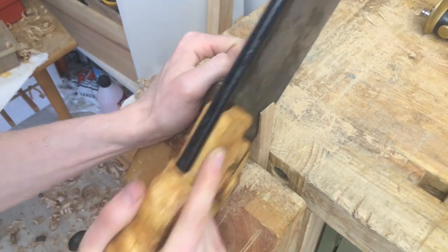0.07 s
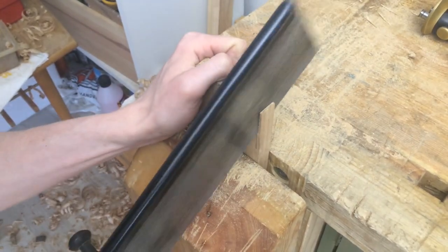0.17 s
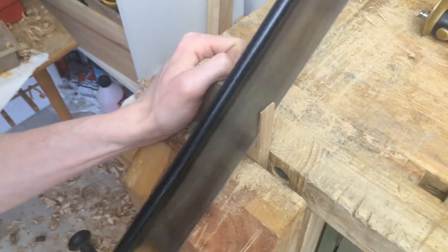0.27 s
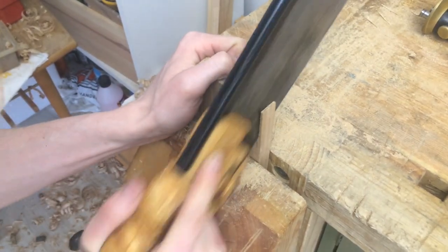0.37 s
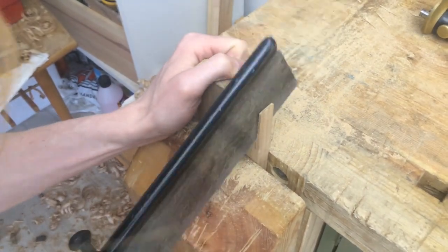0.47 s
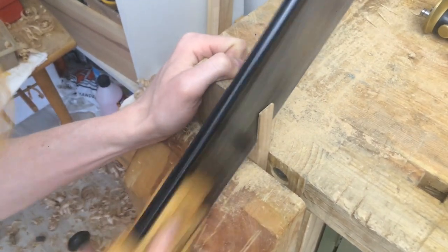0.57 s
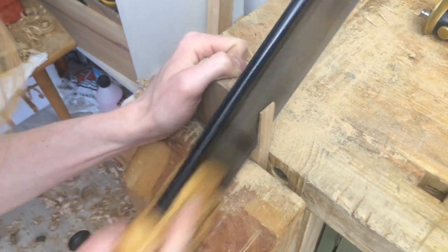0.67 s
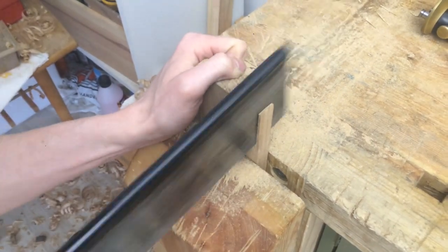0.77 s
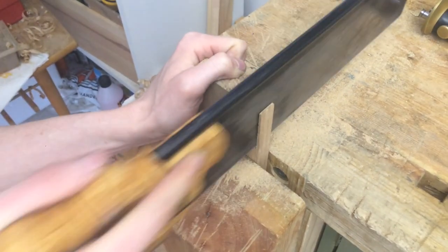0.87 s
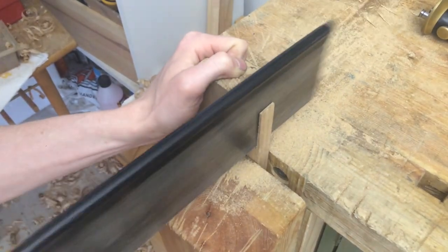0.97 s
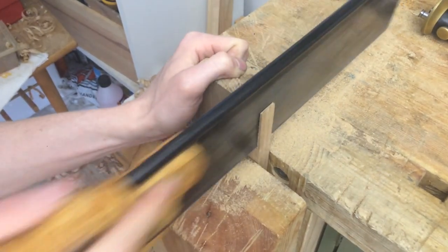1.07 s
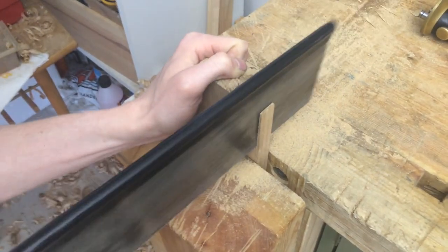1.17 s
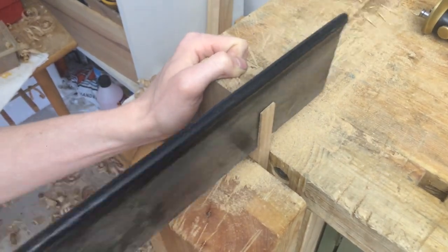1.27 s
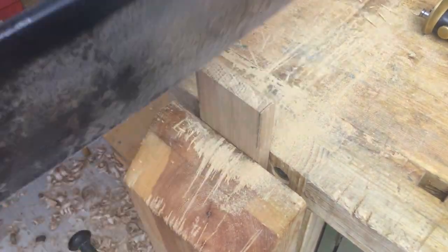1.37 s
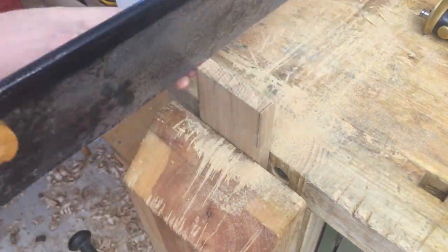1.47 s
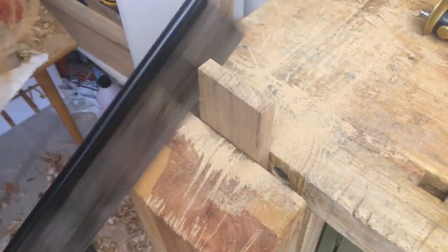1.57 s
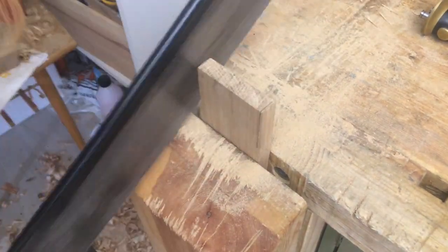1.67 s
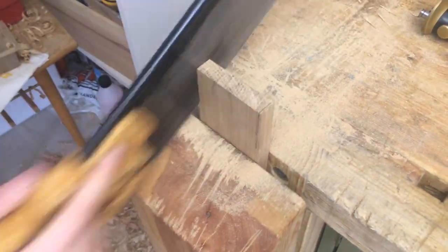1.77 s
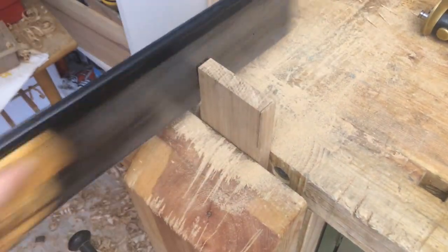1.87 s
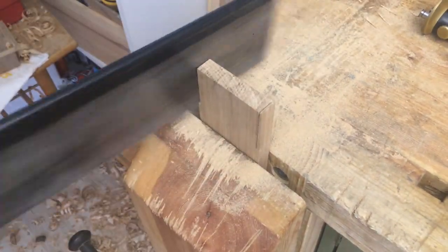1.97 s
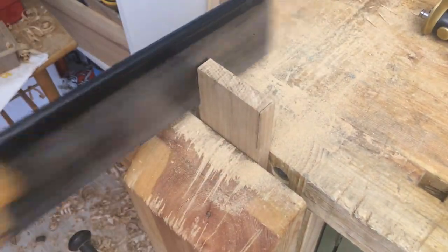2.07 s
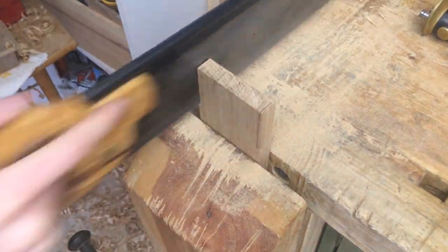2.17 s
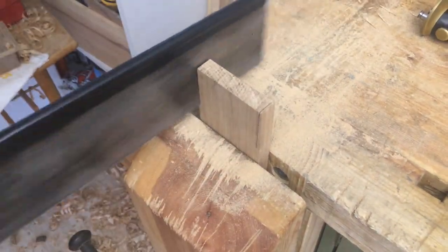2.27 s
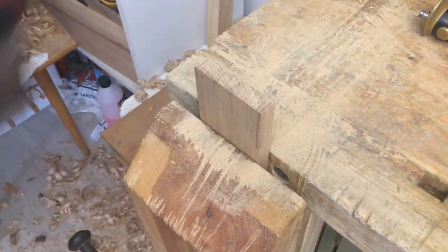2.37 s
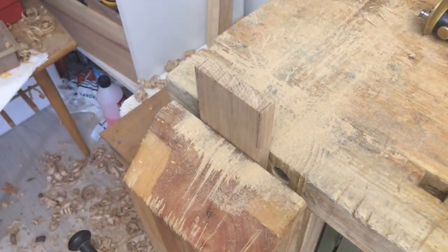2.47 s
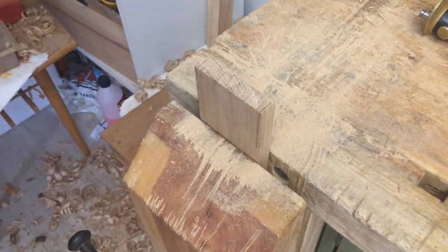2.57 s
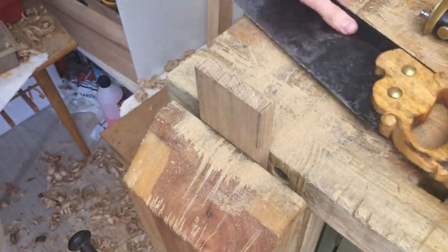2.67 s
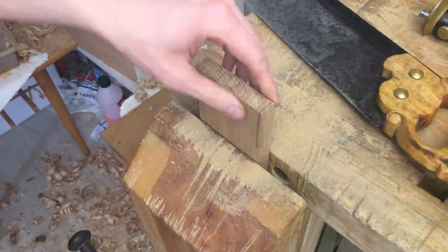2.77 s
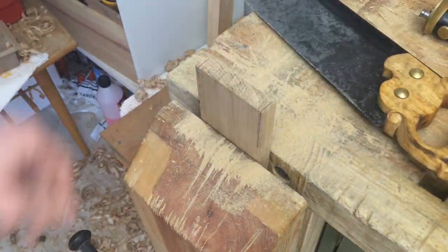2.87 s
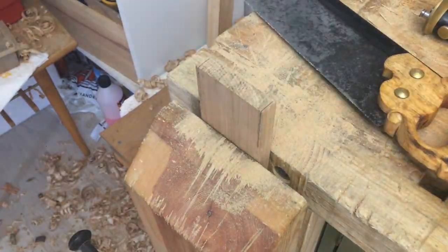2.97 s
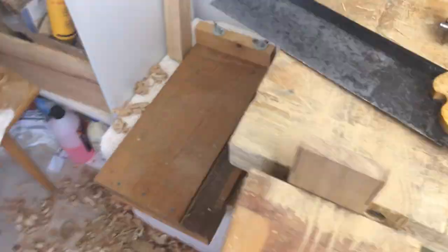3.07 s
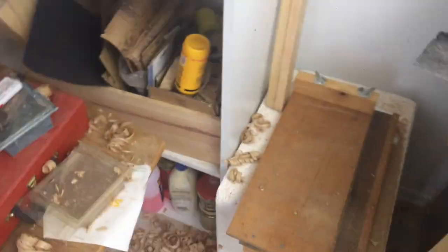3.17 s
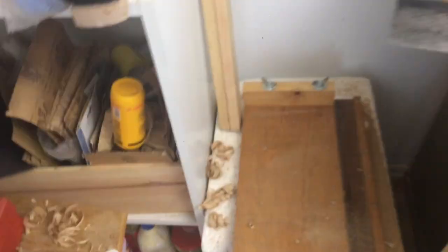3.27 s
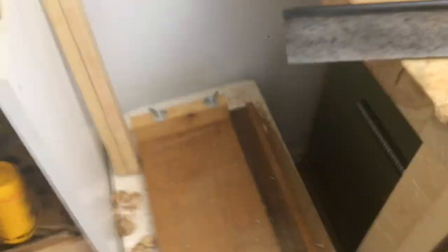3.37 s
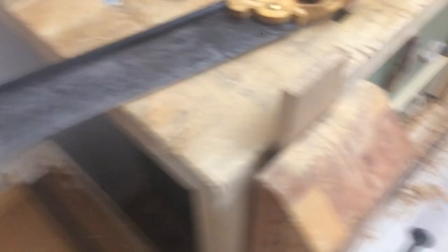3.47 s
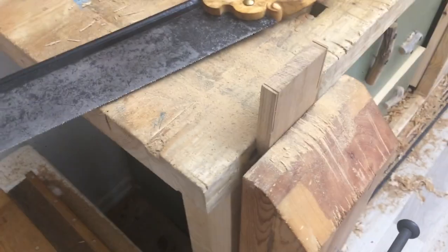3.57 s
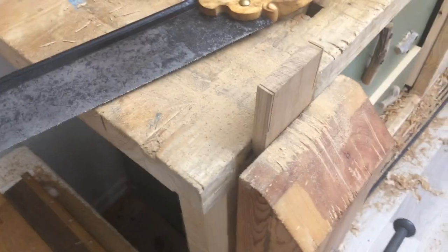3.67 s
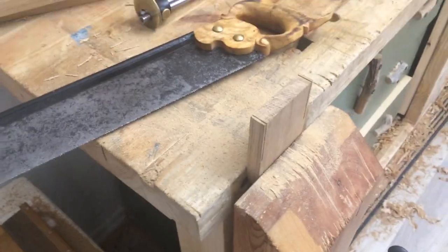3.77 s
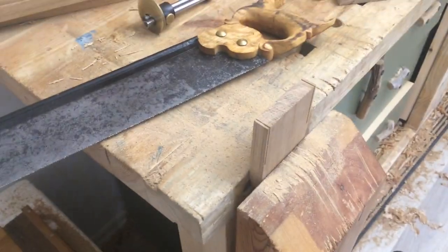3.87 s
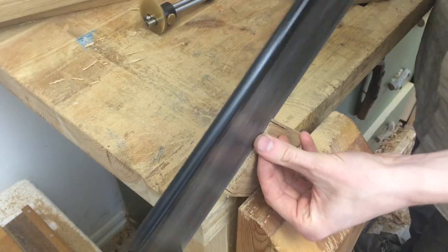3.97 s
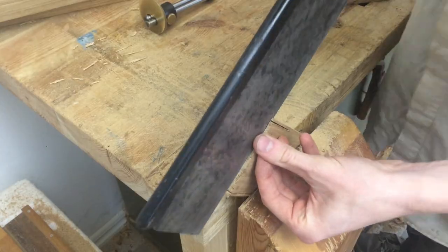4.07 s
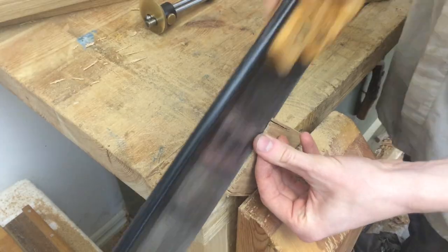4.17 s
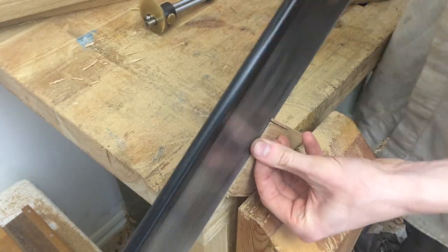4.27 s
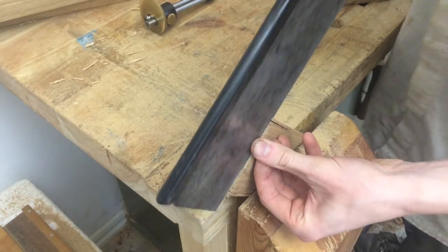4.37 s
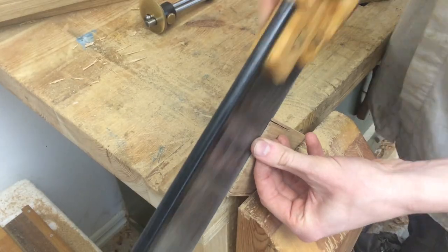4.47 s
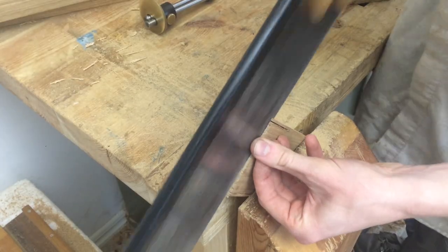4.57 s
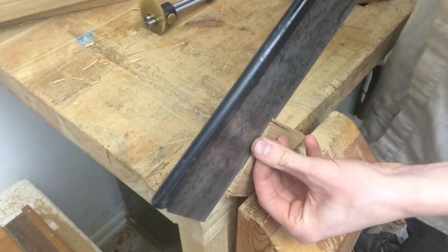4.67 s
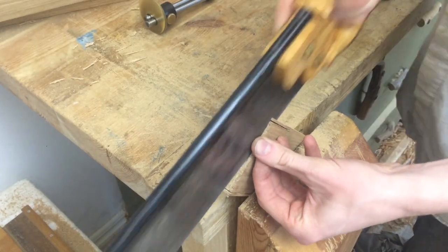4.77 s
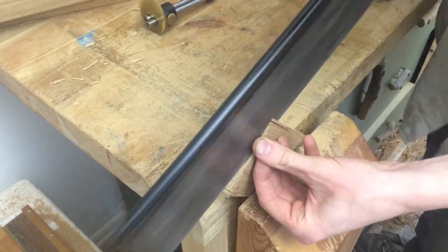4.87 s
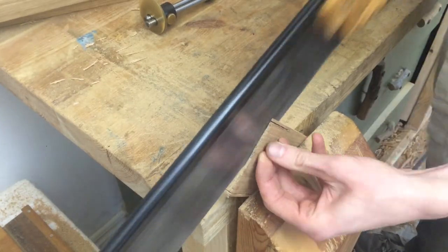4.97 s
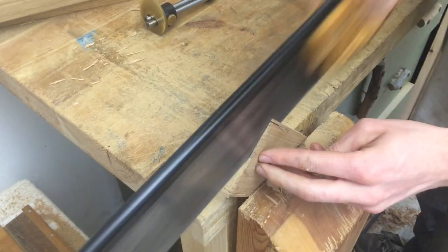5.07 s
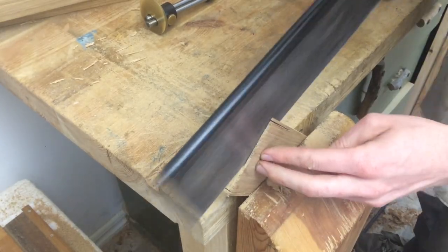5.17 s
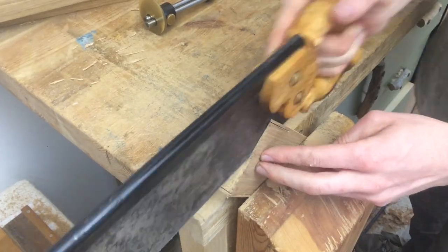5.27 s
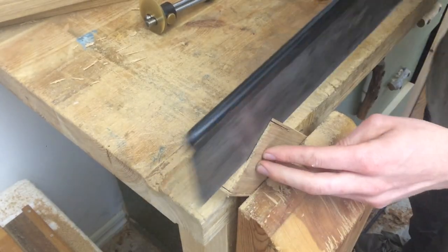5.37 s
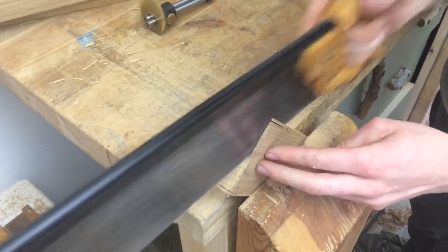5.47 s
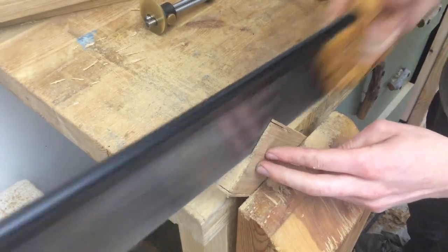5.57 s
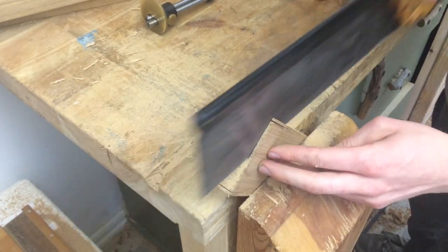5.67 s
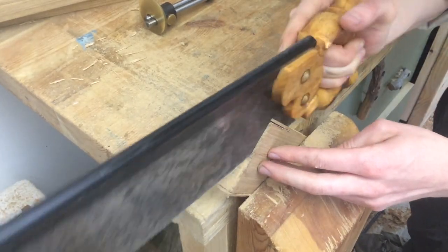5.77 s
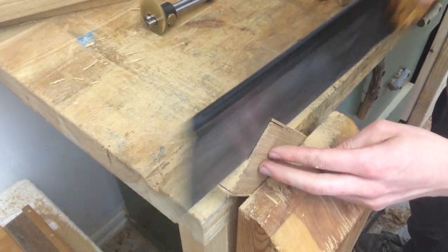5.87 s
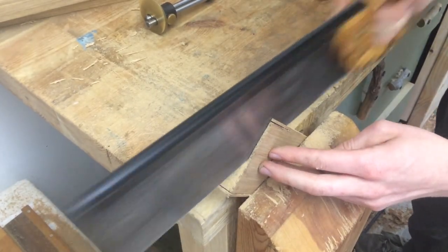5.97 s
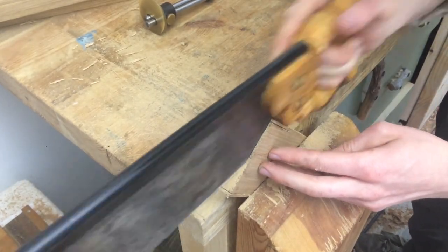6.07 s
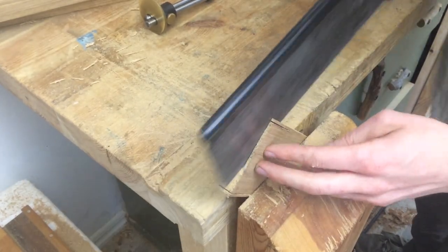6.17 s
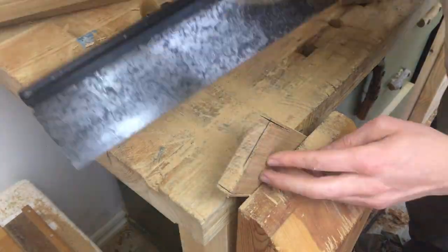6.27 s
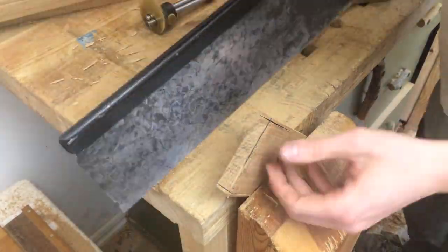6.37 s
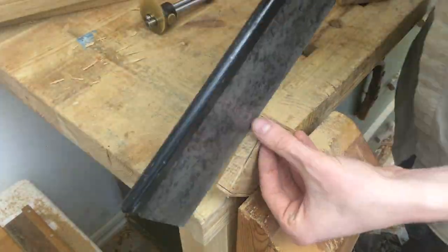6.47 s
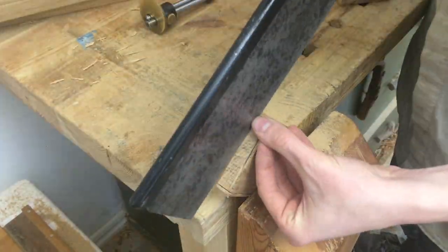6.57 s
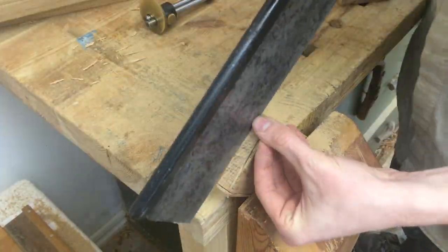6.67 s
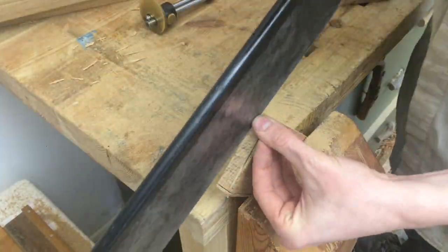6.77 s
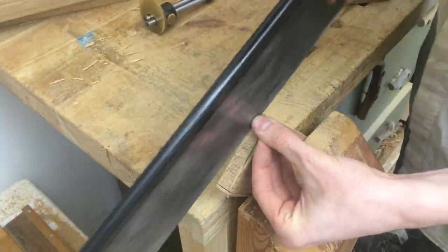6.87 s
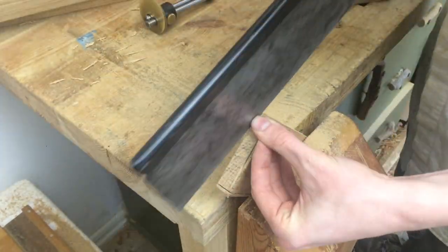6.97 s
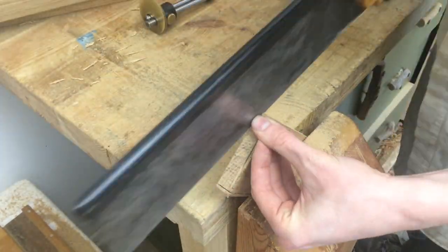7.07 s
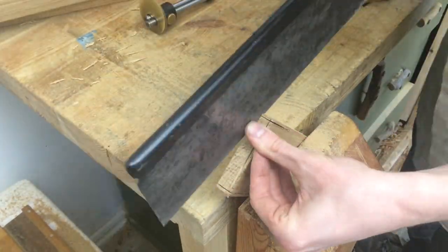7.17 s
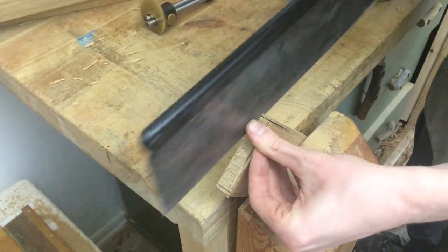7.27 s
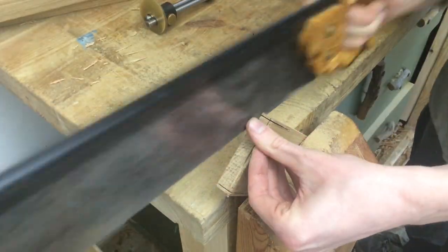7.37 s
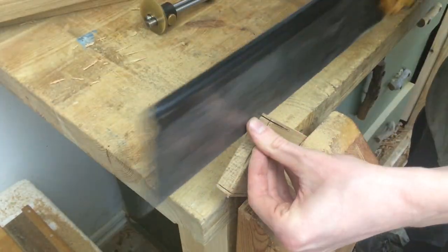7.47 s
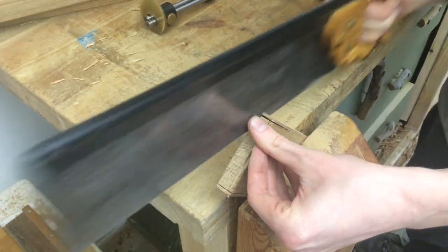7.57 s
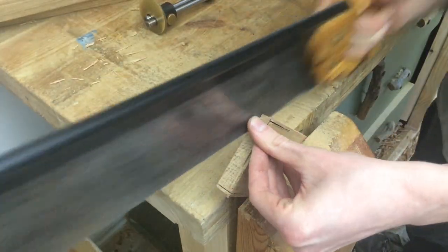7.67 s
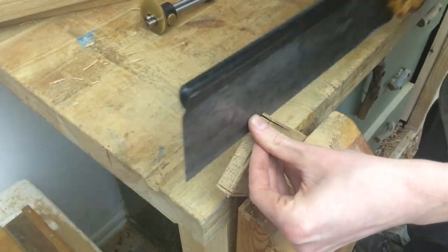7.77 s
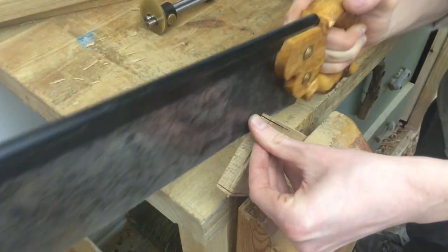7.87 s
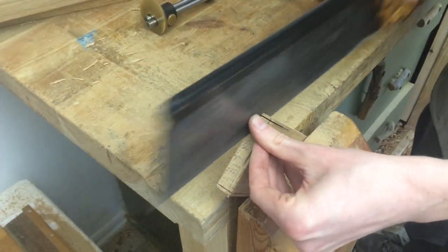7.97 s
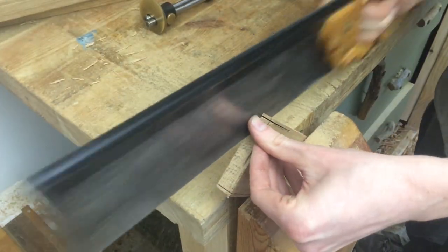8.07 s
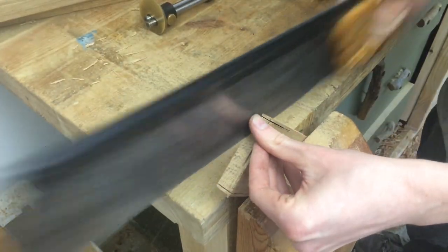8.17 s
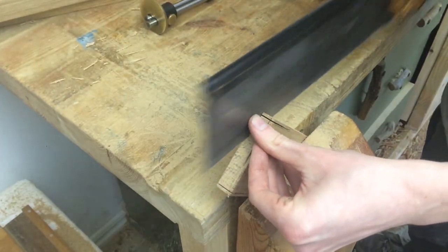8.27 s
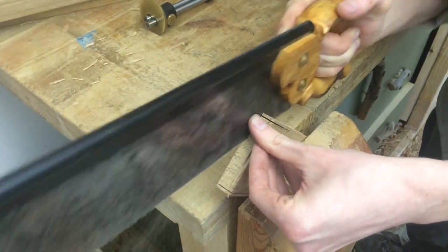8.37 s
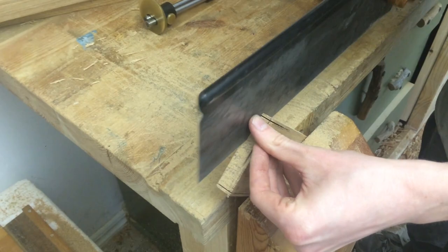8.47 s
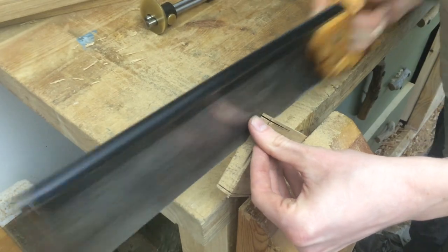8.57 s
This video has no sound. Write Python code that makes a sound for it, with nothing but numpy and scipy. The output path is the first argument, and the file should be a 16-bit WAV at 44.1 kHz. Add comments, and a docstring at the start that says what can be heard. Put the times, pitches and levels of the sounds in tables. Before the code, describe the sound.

Unnaturally fast hand sawing, heard close in a small quiet room. Two strong rasping rips with whistling tooth tones sink from high to lower pitch, each ending in a faint blade ping. The saw clacks down, the wood is turned with dull knocks and scuffs, then finer, softer two-way sawing hisses along, pauses for scrapes and crackling ticks, and resumes to the end.

```python
"""A backsaw cuts a hardwood tenon in a bench vice, in fast motion: about sixteen strokes a second.
First come two rips along the grain, where gliding tones of the tooth rate join filtered friction noise.
Steel clacks, mostly as the saw is laid down, and knocks and rubs of the turned work are noise bursts.
Two shoulder cuts across the grain follow, hissing and chirping; between them the blade slides and teeth snap.
Pings of the freed blade end both rips; short reflections and quiet air of the room surround it all."""
import sys
import numpy as np
from scipy import signal
from scipy.fft import rfft, irfft
from scipy.io import wavfile
from scipy.ndimage import uniform_filter1d

SR = 44100
rng = np.random.default_rng(int(sys.argv[2]) if len(sys.argv) > 2 else 0)


def persist_wave(psi):
    """Save psi, clipped to +-1, as 16-bit WAV."""
    counts = np.round(np.clip(psi, -1, 1) * 32767).astype(np.int16)
    wavfile.write(sys.argv[1], SR, np.atleast_2d(counts).T)


N = 381024
TIME = np.arange(N) / SR
NEAR = np.arange(-3000, 3000) / SR  # time around the centre of one movement [s]
CUTOFF_HZ = 15900

# The arm's usual beat, push plus pull; it hurries or lags a little to meet each mark below.
STROKE_S = 0.0625
# Marks of the two cuts along the grain: (time [s], push effort [dB], nominal tooth rate [Hz])
FIRST_RIP_MARKS = [(.028, -21.5, 5660), (.089, -20.5, 5900), (.458, -20.5, 6100), (.699, -20, 5990),
                   (.76, -17.5, 5480), (.821, -21, 4300), (1.011, -21.5, 3990), (1.148, -21, 4260),
                   (1.233, -21, 4060)]
SECOND_RIP_MARKS = [(1.555, -18.5, 6660), (1.722, -22, 6260), (1.842, -19, 6000), (1.902, -18, 5240),
                    (1.966, -18.5, 4900), (2.107, -20.5, 4425), (2.315, -21, 4650)]
# A push draws the same run of teeth through the wood, so slow pushes last longer.
TEETH_PER_PUSH = 68
RIP_PULL_DB, RIP_PULL_SPREAD_DB = -35.5, 3
# Marks of the two cuts across the grain: (time [s], push effort [dB])
FIRST_SHOULDER_MARKS = [(4.003, -28), (4.424, -31), (4.484, -25), (4.604, -29), (4.722, -30),
                        (4.786, -28.5), (5.357, -26), (5.729, -25), (6.160, -25.5)]
SECOND_SHOULDER_MARKS = [(7.245, -29), (7.318, -27.5), (7.449, -27), (7.888, -27.5), (8.079, -26),
                         (8.518, -26), (8.643, -27.5)]
# Across the grain the pull follows part of a beat after the push, with a force of its own.
CROSS_PULL_SHARE, CROSS_PULL_DB, CROSS_PULL_SPREAD_DB = 0.48, -30, 1.32
# In the later part of the first shoulder cut the strokes gain a lower tooth chirp.
LOW_CHIRP_CENTRE_S, LOW_CHIRP_REACH_S, LOW_CHIRP_DB = 5.6, 1.0, -37
LOW_CHIRP_HZ, LOW_CHIRP_LENGTH_S = 2600, 0.01073

# Resonances of blade and clamped wood: (centre [Hz], width [Hz], lift [dB])
RIP_RESONANCES = [(584, 128, 12.5), (850, 41, 6.5), (1298, 53, 8), (1787, 140, 8.5), (2250, 220, 6.5),
                  (2890, 52, 8.5), (3730, 290, 5.5), (3970, 120, 10), (4400, 180, 7.5), (4700, 130, -5),
                  (5500, 80, 6), (5740, 70, 2.5), (6140, 33, 4.5), (7270, 140, 0.5), (10900, 350, 6)]
CROSS_RESONANCES = [(578, 95, 11), (728, 51, -1.5), (840, 49, 12), (1595, 100, 3.5), (2364, 100, 12),
                    (3210, 220, 4.5), (3710, 300, 4), (4050, 120, 6.5), (4440, 90, 6.2), (4850, 210, 5.7),
                    (5320, 100, 1.8), (6400, 150, 8.1), (10300, 100, 6.5), (10780, 250, 5), (14270, 400, 5)]
# Friction spectra along the grain, teeth biting, fibres tearing, blade dragging:
# (frequency [Hz], relative density [dB])
RIP_BITE_SPECTRUM = [(40, -57), (250, -30), (600, -28), (1300, -35), (2500, -7.5), (4000, -5.5), (6000, 4),
                     (9000, 3), (12000, 0.5), (16000, -2)]
RIP_TEAR_SPECTRUM = [(40, -31), (200, -27.5), (500, -13.5), (900, -6.5), (1300, 1), (2200, -5.5),
                     (4500, -0.5), (8000, -22), (16000, -14.5)]
RIP_DRAG_SPECTRUM = [(40, -25), (150, -18), (300, -11.5), (550, -1.5), (900, 0), (2000, 0.5), (3200, 1),
                     (4200, 2.5), (5600, -1), (9500, -4.5), (12000, -3.5), (16000, -5)]
# Friction spectra across the grain, bite and drag: (frequency [Hz], relative density [dB])
CROSS_BITE_SPECTRUM = [(40, -31.5), (300, -22.5), (700, -11.5), (1500, -3.5), (2700, -3), (3800, 0.5),
                       (5500, -4.5), (7500, 2), (9000, -2.5), (11000, 1.5), (14000, 4.5), (16000, 0.5)]
CROSS_DRAG_SPECTRUM = [(40, -22), (150, -23), (300, -9.5), (450, -5), (650, 2), (950, 1), (1400, -1.5),
                       (2000, -9), (4000, -3.5), (6000, -4), (9000, -28), (16000, -9)]

# Single teeth catch and snap a fibre: (time [s], relative crack level [dB], relative thud level [dB])
FIBRE_SNAPS = [(1.564, -4, -35), (6.941, -12.5, -18), (6.946, -13, -34), (6.96, -11, -36),
               (6.967, -12, -15), (6.975, -10.5, -31), (6.981, -13, -14), (7.0781, -16, -23),
               (7.085, -16, -40), (7.108, -7.5, -36), (7.2663, -14, -30), (7.2765, -13, -34)]
# Snap spectra, sharp crack and jolt of the work: (frequency [Hz], relative density [dB])
CRACK_SPECTRUM = [(60, -21), (500, 3.5), (2000, 4), (7000, 4), (16000, -3)]
THUD_SPECTRUM = [(30, -7), (150, -23.5), (400, -1), (650, 5), (1300, -2.5), (3000, -18), (16000, -33)]

# Steel clacks, mostly as the saw is laid down, a few around the cuts:
# (time [s], level [dB], 60 dB decay time [s])
STEEL_CLACKS = [(1.477, -43, .03), (2.676, -49.5, 0.029), (2.682, -35.5, 0.036), (2.7208, -43, 0.032),
                (2.7305, -15.5, 0.032), (2.85, -53, 0.07), (2.871, -52, 0.088), (3.028, -52.5, .02),
                (3.663, -49, .03), (5.612, -25.5, 0.025)]
# Knocks, wood on wood, and during the shoulder cut teeth catching in the kerf: (time [s], level [dB], 60 dB
# decay time [s])
WOOD_KNOCKS = [(3.1115, -28, 0.014), (3.267, -25, 0.033), (3.3105, -34, 0.04), (3.4495, -28.5, 0.0068),
               (3.9435, -44, 0.059), (4.613, -33, 0.02), (4.729, -35, 0.023), (5.735, -19, 0.013),
               (5.752, -25.5, 0.022), (6.659, -49, 0.046), (6.709, -43, .04), (6.715, -28.5, 0.051),
               (7.213, -48, .025)]
# Wood rubs on bench and vice jaws: (time [s], level [dB], half-power length [s])
WOOD_RUBS = [(3.281, -42, 0.02), (3.316, -37.5, 0.015), (3.35, -43.5, 0.035), (3.425, -37.5, 0.037),
             (3.476, -43.5, 0.018), (3.5, -43.5, .014), (3.71, -53.5, 0.013), (6.727, -41.5, 0.017),
             (6.76, -46.5, 0.016)]
# Light slides of the blade, in and out of the kerf, and tentative starting strokes:
# (time [s], level [dB], half-power length [s])
BLADE_SLIDES = [(1.29, -38.5, 0.02), (1.33, -36.5, 0.013), (1.375, -57, 0.038), (1.436, -47.5, 0.033),
                (1.522, -30, 0.022), (2.341, -38, 0.012), (3.139, -48, .075), (3.87, -54, 0.013),
                (3.981, -35, 0.0095), (6.208, -30, 0.013), (6.316, -39, 0.022), (6.727, -32, 0.016),
                (6.852, -44, 0.031), (6.9, -29, 0.025), (6.968, -39, 0.041), (7.04, -29.5, 0.031),
                (7.092, -33, 0.02), (7.142, -37.5, 0.013), (7.216, -33, 0.0052), (7.226, -44, .012)]
# Handling spectra, steel, wood, sliding: (frequency [Hz], relative density [dB])
CLACK_SPECTRUM = [(60, -52), (500, -12), (1600, -9.5), (2300, -0.5), (2830, -3), (3400, -1), (4700, -1.5),
                  (5600, -4.5), (7000, -7.5), (11000, -11.5), (16000, -15)]
WOOD_SPECTRUM = [(30, -31), (150, -28.5), (300, -13), (500, 2), (850, 2), (1500, -1.5), (2000, -7.5),
                 (4200, -8.5), (5600, -3.5), (7200, -11.5), (16000, -15)]
SLIDE_SPECTRUM = [(35, -79), (60, -46.5), (579, -9.5), (2350, -7), (2770, -8.5), (3040, -5), (5330, -5),
                  (7060, -3), (8710, -4.5), (14200, -1), (16000, -7.5)]

# The blade leaves the kerf and rings: (time [s], level [dB])
BLADE_PINGS = [(1.33, -32), (2.343, -49)]
# Modes of the free blade: (frequency [Hz], relative level [dB], 60 dB decay time [s])
BLADE_MODES = [(4060, -11, 0.07), (5190, -12, .058), (6788, -3, 0.046), (8210, 4.5, 0.037),
               (9600, -7, 0.034), (11230, 4, .03), (14810, -6, .035)]

# Spectrum of the room air: (frequency [Hz], relative density [dB])
AIR_SPECTRUM = [(30, -37), (150, -30), (300, -15), (450, -13), (570, -1.5), (750, -9), (1150, -6.5),
                (2000, -20), (2450, -14), (3200, -22.5), (16000, -31.5)]
# Resonance in the room air: (centre [Hz], width [Hz], lift [dB])
AIR_RESONANCE = [(614, 78, 7.3)]
AIR_DB = -59.5


def from_db(db):
    """Definition of level: 20 dB is a tenfold amplitude."""
    return 10 ** (np.asarray(db) / 20)


def add(track, s, sound):
    """Superposition: mix a sound into the track from time s on."""
    start = int(round(s * SR))
    first, last = max(start, 0), min(start + len(sound), N)
    if last > first:
        track[first:last] += sound[first - start:last - start]


def swell(length, edge=2.9):
    """Half-power width: a bell whose power exceeds one half for the length; a larger edge is more abrupt."""
    return 2 ** (-.5 * np.abs(2 * NEAR / length) ** edge)


def swells(rows, edge=2.8):
    """Power addition: the amplitude curve of a series of movements (time, dB, length)."""
    power = np.zeros(N)
    for s, db, length in rows:
        add(power, s + NEAR[0], (from_db(db) * swell(length, edge)) ** 2)
    return np.sqrt(power)


def grit(grain_db, size=128):
    """Granular noise: dense fibre breaks in grains of a few ms, varied in strength and pitch region; rms 1."""
    cells = signal.stft(rng.standard_normal(N), nperseg=size)[2]
    grains = rng.standard_normal(cells.shape)
    grains = uniform_filter1d(grains, size=7, axis=0)  # across frequency
    grains = uniform_filter1d(grains, size=2, axis=1)  # across time
    strength = from_db(grain_db * np.clip(grains / grains.std(), -3, 2.5))
    noise = signal.istft(cells * strength, nperseg=size)[1][:N]
    return noise / noise.std()


def coloured(x, spectrum, body=(), size=8192):
    """Source-filter principle: causal filter, unit mean power gain, smooth spectrum lifted by resonances."""
    hz = np.maximum(np.fft.rfftfreq(size, 1 / SR), 1)
    points = np.array(spectrum)
    db = np.interp(np.log(hz), np.log(points[:, 0]), points[:, 1])
    for centre, width, lift in body:
        db = db + lift / (1 + (2 * (hz - centre) / width) ** 2)
    gain = from_db(db)
    # only power below the cutoff counts
    gain = gain / np.sqrt(np.mean(gain ** 2 * (hz < CUTOFF_HZ)))
    # a folded cepstrum gives minimum phase
    cepstrum = irfft(np.log(gain))[:size // 2]
    cepstrum[1:] *= 2
    response = irfft(np.exp(rfft(cepstrum, size)))[:size // 2]
    return signal.oaconvolve(x, response)[:N]


def zips(rows, glide, jitter, octave_db, arch=0.045):
    """Tooth-passing tone: a wobbling rate arches and glides with each stroke (time, dB, length, Hz)."""
    out = np.zeros(N)
    for s, db, length, hz in rows:
        chance = uniform_filter1d(rng.standard_normal((2, len(NEAR))), size=48)
        wobble, grip = chance / chance.std()
        travel = np.clip(2 * NEAR / length, -2, 2)
        bend = glide * rng.uniform(.4, 1.6) * travel / 2 - arch * travel ** 2
        rate = hz * np.exp(bend + jitter * wobble)
        phase = 2 * np.pi * np.cumsum(rate) / SR
        tone = np.sin(phase) + from_db(octave_db) * np.sin(2 * phase)
        force = from_db(db + 2.7 * np.clip(grip, -3, 2)) * swell(length)
        add(out, s + NEAR[0], force * tone)
    return out


def strokes(*cuts):
    """Periodic excitation: an even beat from mark to mark while effort and speed glide; a column per stroke."""
    out = []
    for cut in cuts:
        marks = np.transpose(cut)
        beats = np.r_[0, np.cumsum(np.round(np.diff(marks[0]) / STROKE_S))]
        each = np.arange(beats[-1] + 1)
        out.append([np.interp(each, beats, column) for column in marks])
    return np.hstack(out)


def rip_strokes():
    """Length is tooth count over tooth rate: time, push dB, push length, tooth rate, pull dB."""
    s, db, hz = strokes(FIRST_RIP_MARKS, SECOND_RIP_MARKS)
    pull_db = RIP_PULL_DB + RIP_PULL_SPREAD_DB * rng.standard_normal(len(s))
    return s, db, TEETH_PER_PUSH / hz, hz, pull_db


def rip_cut(pull_lag=0.025, pull_length=0.019, entry_lead=0.022, entry_length=0.025, even_hz=5000):
    """Speed-dependent friction: quick pushes zip brightly, slow ones tear fibres, and the blade drags back."""
    s, db, length, hz, pull_db = rip_strokes()
    speed = np.log2(hz / even_hz)  # octaves
    second = s >= SECOND_RIP_MARKS[0][0]

    biting = swells(zip(s, db - 3.0 + 5.8 * speed, length), edge=3.1)
    bite = coloured(biting * grit(grain_db=4.5), RIP_BITE_SPECTRUM, RIP_RESONANCES)
    tear_db = db - 10.5 - 14 * speed + 2.8 * second
    tearing = swells(zip(s - .001, tear_db, length * 1.11), edge=2.7)
    tear = coloured(tearing * grit(grain_db=3.5), RIP_TEAR_SPECTRUM, RIP_RESONANCES)

    # in the second kerf the teeth strike more sharply and the octave stands out
    rows = np.transpose([s, db - 4.5 + 7.4 * speed, length * .85, hz * 1.02])
    teeth = zips(rows[~second], glide=-.09, jitter=0.039, octave_db=-25)
    teeth += zips(rows[second], glide=0.049, jitter=0.041, octave_db=-13.0)
    # on a quick return the teeth skate and whistle thinly
    whistle_db = pull_db + 0.5 + 12 * speed - 10 * second
    returns = zip(s + pull_lag, whistle_db, length * 1.1, hz * 1.58)
    teeth += zips(returns, glide=0.029, jitter=.09, octave_db=-40.5)

    # longer strokes have longer returns
    stretch = (length / length.mean()) ** 0.1
    pulls = zip(s + pull_lag * stretch, pull_db - 1.5, pull_length * stretch)
    entries = ((t - entry_lead * k, -35, entry_length * k) for t, k in zip(s, stretch))
    dragging = swells([*pulls, *entries], edge=2.74)
    drag = coloured(dragging * grit(grain_db=4), RIP_DRAG_SPECTRUM, RIP_RESONANCES)

    # the workpiece springs back as each push ends
    springing = swells((t + 0.013, -41 - 6 * v, .016) for t, v in zip(s, speed))
    recoil_spectrum = [(40, -34), (400, -13.5), (620, 3.5), (900, -7.0), (3000, -36.5)]
    recoil = coloured(springing * grit(grain_db=4), recoil_spectrum, RIP_RESONANCES)
    return bite + tear + teeth + drag + recoil


def cross_strokes():
    """Alternating excitation, pull after push: push time, push dB, pull time, pull dB."""
    cuts = [strokes(FIRST_SHOULDER_MARKS), strokes(SECOND_SHOULDER_MARKS)]
    s, db = np.hstack(cuts)
    beat = np.hstack([np.gradient(cut[0]) for cut in cuts])
    pull_db = CROSS_PULL_DB + CROSS_PULL_SPREAD_DB * rng.standard_normal(len(s))
    return s, db, s + CROSS_PULL_SHARE * beat, pull_db


def cross_cut(push_length=.012, pull_length=0.013, push_hz=7300, pull_hz=7700):
    """Two-way friction: across the grain the teeth cut both ways, with a finer hiss and short chirps."""
    push_s, push_db, pull_s, pull_db = cross_strokes()
    all_s = np.r_[push_s, pull_s]
    effort = push_db - push_db.mean()
    pushes = swells(((s, db - .3, push_length) for s, db in zip(push_s, push_db)), edge=1.75)
    pulls = swells(((s, db - .6, pull_length) for s, db in zip(pull_s, pull_db)), edge=2.65)
    biting = np.hypot(pushes, pulls)
    bite = coloured(biting * grit(grain_db=4.0), CROSS_BITE_SPECTRUM, CROSS_RESONANCES)

    # the side of the blade rubs in the kerf, swelling once per push and once per pull
    rubbing = swells(((s + 0.0076, -38 + rng.normal(0, 1), .02) for s in all_s), edge=2.7)
    drag = coloured(rubbing * grit(grain_db=3.5), CROSS_DRAG_SPECTRUM, CROSS_RESONANCES)

    # harder pushes chirp more clearly, and the speed varies from beat to beat
    pace = 1 + 0.056 * rng.standard_normal(len(push_s))
    push_rows = zip(push_s - .001, push_db - 1.0 + effort, np.full(len(pace), .004), push_hz * pace)
    pull_rows = zip(pull_s - .001, pull_db - 4.5, np.full(len(pace), .006), pull_hz * pace)
    teeth = zips(push_rows, glide=.2, jitter=0.036, octave_db=-4)
    teeth += zips(pull_rows, glide=-0.05, jitter=0.056, octave_db=-18)
    return bite + drag + teeth + low_chirp(all_s)


def low_chirp(stroke_s):
    """Low tooth chirp: a lower tone arches with the blade's speed, strongest around 5.6 s."""
    chirp_s = stroke_s[np.abs(stroke_s - LOW_CHIRP_CENTRE_S) < LOW_CHIRP_REACH_S]
    chirp_db = LOW_CHIRP_DB - 3 * (2 * (chirp_s - LOW_CHIRP_CENTRE_S) / LOW_CHIRP_REACH_S) ** 2
    rows = [(s + 0.00094, db, LOW_CHIRP_LENGTH_S, LOW_CHIRP_HZ) for s, db in zip(chirp_s, chirp_db)]
    return zips(rows, glide=0.0199, jitter=0.033, octave_db=-16, arch=.08)


def clicks(times, levels_db):
    """Impulse excitation: one single-sample pulse per event."""
    out = np.zeros(N)
    out[np.round(times * SR).astype(int)] = from_db(levels_db)
    return out


def snaps():
    """Impulse response: a caught tooth lets go with a crack and jolts the workpiece."""
    s, crack_db, thud_db = np.transpose(FIBRE_SNAPS)
    crack = coloured(clicks(s, crack_db + 4.0), CRACK_SPECTRUM)
    thud = coloured(clicks(s, thud_db + 3.5), THUD_SPECTRUM)
    return crack + thud


def blows(rows):
    """Exponential decay: each contact (time, dB, decay time) is a dying burst of micro-impacts."""
    force, age = np.zeros(N), TIME[:SR // 4]
    for s, db, t60 in rows:
        add(force, s, from_db(db - 60 * age / t60))
    return force * grit(grain_db=-0.5)


def handling():
    """Impact and sliding friction: steel clacks, wood knocks and catching teeth, wood rubs, and the blade
    slides lightly."""
    steel = coloured(blows(STEEL_CLACKS), CLACK_SPECTRUM, [(4220, 690, 5.7), (4940, 160, 5.7)])
    rubbing = swells(WOOD_RUBS, edge=2.3) * grit(grain_db=7.0)
    wood = coloured(blows(WOOD_KNOCKS) + rubbing, WOOD_SPECTRUM, [(1510, 580, 2.2)])
    sliding = swells(BLADE_SLIDES, edge=3.35) * grit(grain_db=5.5)
    slide_body = [(hz, width, 0.99 * lift) for hz, width, lift in CROSS_RESONANCES]
    return steel + wood + coloured(sliding, SLIDE_SPECTRUM, slide_body)


def blade_ring():
    """Modal superposition: the freed blade rings briefly as a sum of decaying sines."""
    age = TIME[:SR // 5]
    ring = np.zeros(len(age))
    for hz, db, t60 in BLADE_MODES:
        ring += from_db(db - 60 * age / t60) * np.sin(2 * np.pi * hz * age)
    return signal.oaconvolve(clicks(*np.transpose(BLADE_PINGS)), ring)[:N]


def workshop(x, t60=0.043, wet_db=-15):
    """Diffuse reflection: bench and walls return a short tail; the clutter scatters mostly the treble."""
    age = TIME[:SR // 4]
    tail = rng.standard_normal(len(age)) * from_db(-60 * age / t60)
    tail *= age > .002  # the first reflection arrives after 2 ms
    echo = signal.oaconvolve(x, tail / np.linalg.norm(tail))[:N]
    echo_spectrum = [(100, -8), (900, -6), (2500, 1), (5000, 3.5), (16000, 1.5)]
    return x + from_db(wet_db) * coloured(echo, echo_spectrum)


def room_air():
    """Stationary noise: the quiet air of the room, with one broad resonance."""
    return from_db(AIR_DB) * coloured(grit(grain_db=3.5), AIR_SPECTRUM, AIR_RESONANCE)


def scene():
    """Superposition: all the work at the bench, reflected by the workshop, over the room air."""
    work = rip_cut() + cross_cut() + snaps() + handling() + blade_ring()
    return (workshop(work) + room_air())[None]


def record(dry):
    """Band limitation: a linear-phase low-pass cuts the top steeply."""
    lowpass = signal.firwin(401, CUTOFF_HZ, fs=SR)
    return signal.oaconvolve(dry, lowpass[None], "same")


dry = scene()
out = record(dry)
persist_wave(out)
```